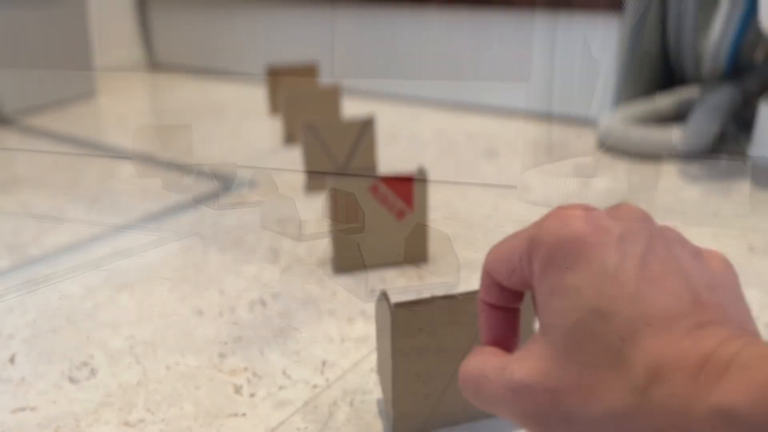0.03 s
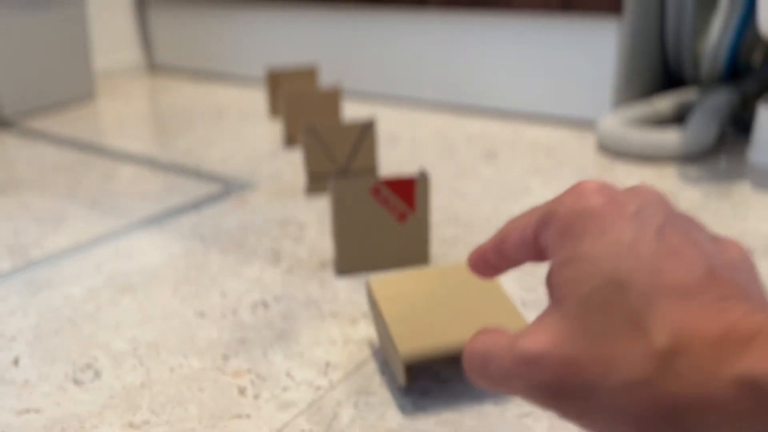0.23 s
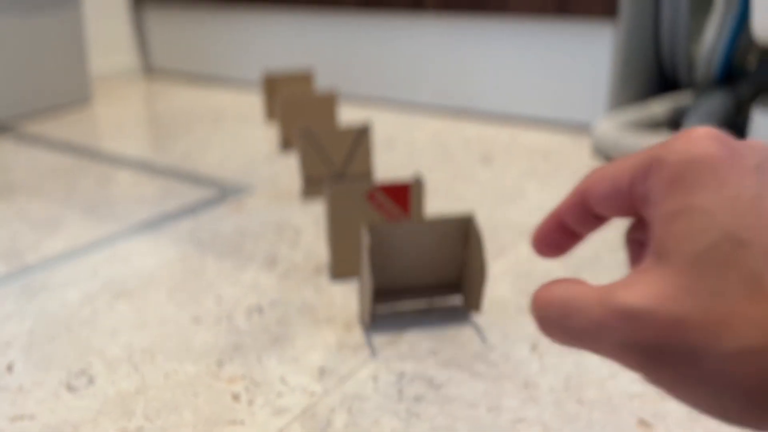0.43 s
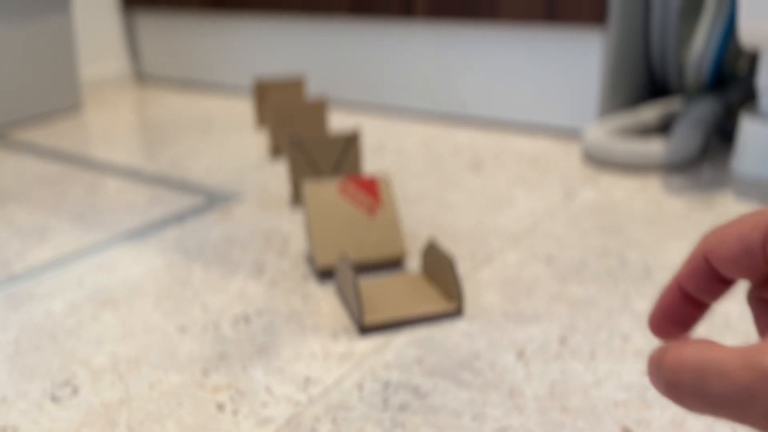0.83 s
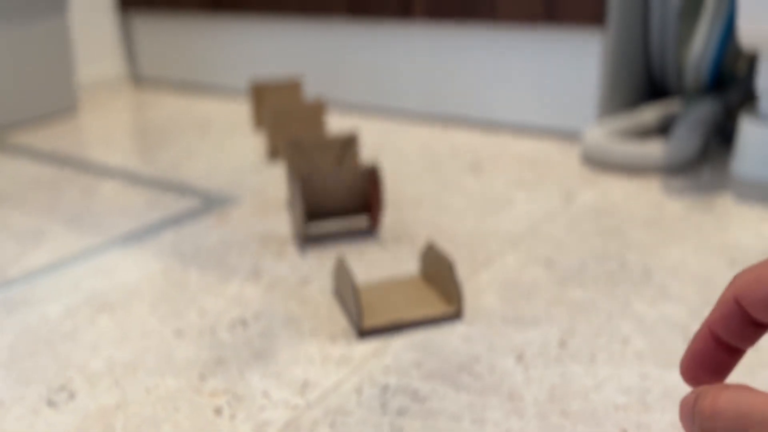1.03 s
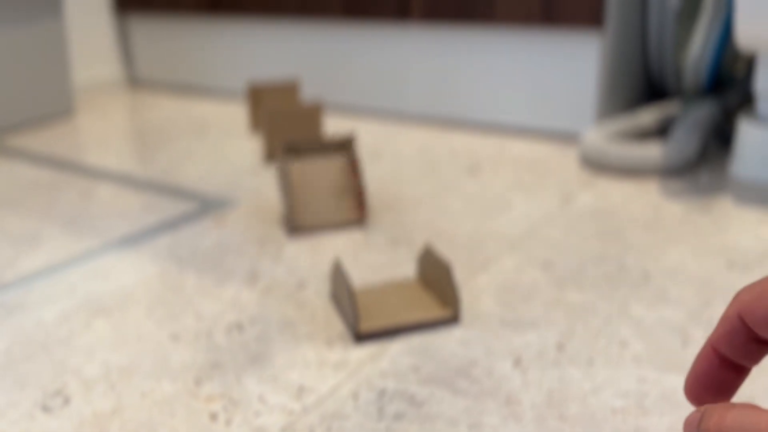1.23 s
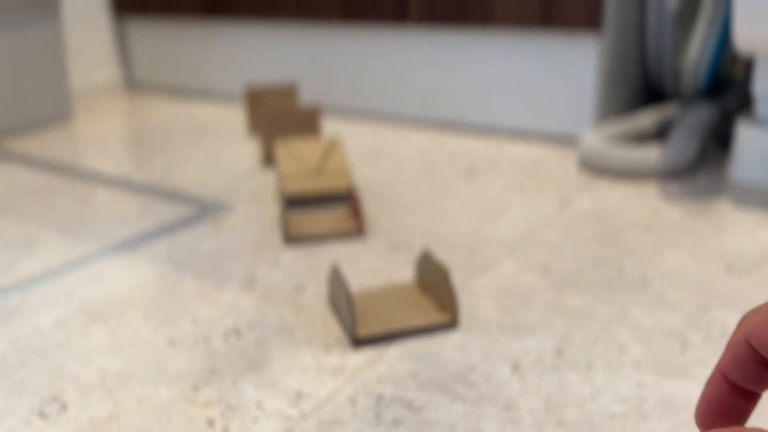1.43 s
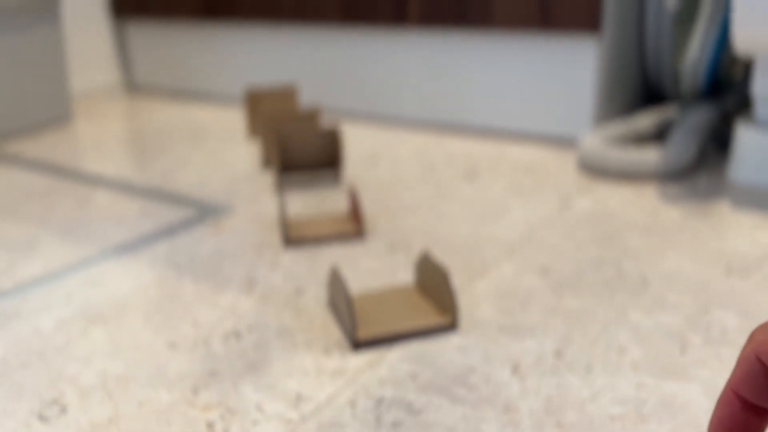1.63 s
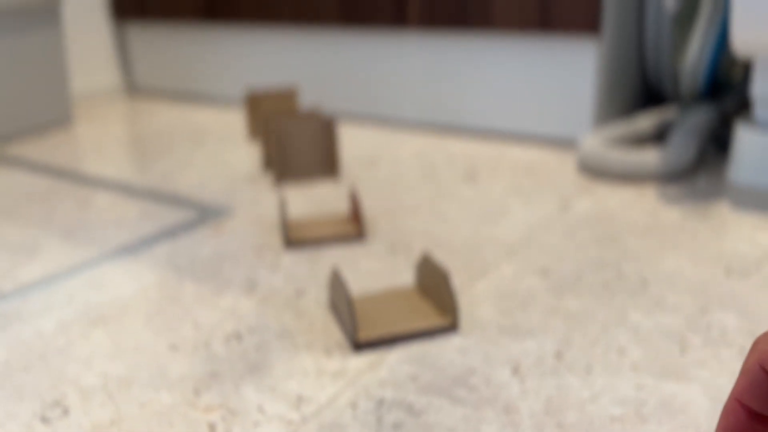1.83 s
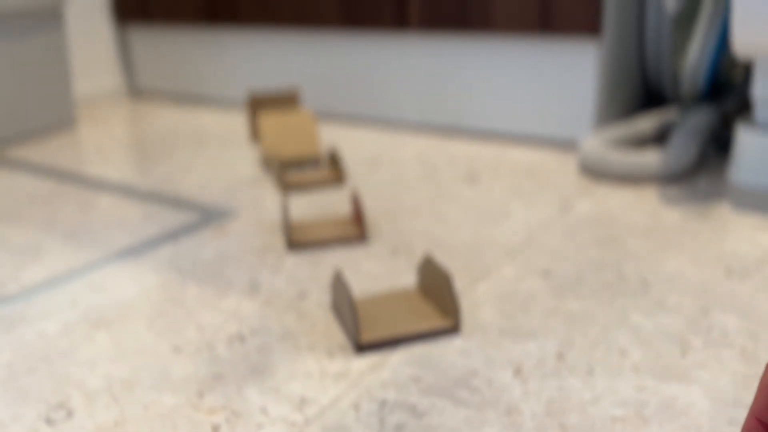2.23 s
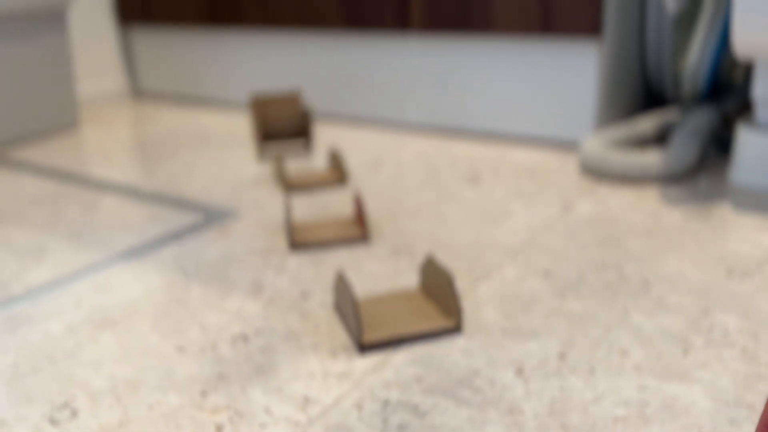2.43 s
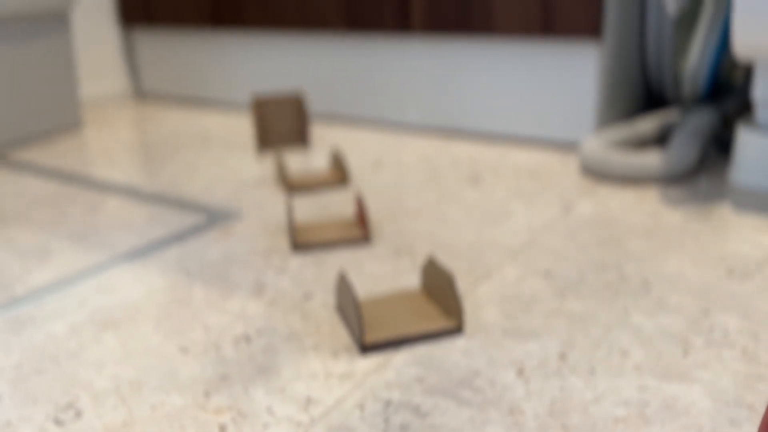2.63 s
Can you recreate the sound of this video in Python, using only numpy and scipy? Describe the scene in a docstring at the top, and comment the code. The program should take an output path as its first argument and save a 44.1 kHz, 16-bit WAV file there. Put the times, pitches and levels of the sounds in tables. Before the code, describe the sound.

Light cardboard pieces knock each other over in a row after a nearby fingernail click. Each taps the next, scrapes down it and slaps the hard floor, slightly to the left, in a small room with faint ventilation rumble.

```python
"""Folded cardboard pieces topple like dominoes on a stone floor.
They knock into each other and slap the floor, which makes their panels and flaps ring
and pushes out a puff of air. In between, their cut edges scrape down the next piece.
A fingernail flick starts it all. A small room echoes over a low ventilation rumble."""
import sys
import numpy as np
from scipy import signal
from scipy.fft import rfft, irfft
from scipy.io import wavfile

SR = 44100
rng = np.random.default_rng(int(sys.argv[2]) if len(sys.argv) > 2 else 0)


def master_out(mix):
    """Clip the mix to full scale and print it as 16-bit PCM to the path in sys.argv[1]."""
    frames = np.transpose(np.atleast_2d(mix))
    ceiling = np.clip(frames, -1, 1)
    pcm = np.round(ceiling * 32767).astype(np.int16)
    wavfile.write(sys.argv[1], SR, pcm)


N = 119070

# knocks on card and floor: t/s, then level/dB of edge tick, air thump, panel, flaps, crack
KNOCKS = [(0.189, -68, -57, -50, -72, -87), (0.2049, -36, -35, -31.5, -39, -39.5),
          (0.2683, -42, -36, -32, -33, -45), (0.2736, -26, -29.5, -25, -30, -32),
          (0.3316, -35.5, -41, -31, -47, -64), (0.3614, -62, -54, -34, -50, -67),
          (0.3739, -41, -42, -41.5, -65, -67), (0.6556, -36.5, -53, -50.5, -50.5, -62.5),
          (0.8615, -42, -56, -35.5, -45.5, -65.5), (0.9493, -30, -40.5, -43, -41.5, -37.5),
          (1.0304, -37.5, -42.5, -39.5, -52.5, -59), (1.2595, -36.5, -52.5, -59.5, -48, -57.5),
          (1.2672, -29.5, -48.5, -42, -49.5, -71.5), (1.4302, -39, -48.5, -41.5, -41.5, -60.5),
          (1.508, -35, -61, -58, -58, -51), (1.512, -35.5, -63, -55, -37.5, -39),
          (1.5499, -39, -54, -47, -45, -72), (1.5883, -53, -57, -44, -40.5, -66.5),
          (1.5999, -64, -48.5, -40.5, -37.5, -61), (1.7681, -55.5, -57, -56.5, -57.5, -74.5),
          (1.869, -73.5, -63, -59, -61.5, -88), (2.0335, -34.5, -48, -44.5, -45, -63),
          (2.2489, -38.5, -67, -48, -52.5, -61.5), (2.2718, -47, -59, -40, -50, -63.5),
          (2.3404, -50, -41.5, -34.5, -38, -37.5), (2.3888, -58.5, -46, -40, -56, -78),
          (2.4226, -48.5, -44, -37, -47, -72)]
# a slipping edge catches: t/s, rasp level/dB, body level/dB
CATCHES = [(0.5287, -46.5, -69.5), (0.6584, -34.5, -59), (0.6831, -43, -61), (0.7252, -39, -57),
           (0.7485, -26, -57.5), (0.7659, -34.5, -55), (1.1484, -59, -62.5), (1.3164, -28.5, -58),
           (1.3404, -46, -50.5), (1.3755, -36, -46), (2.0645, -45.5, -53), (2.1105, -36, -49),
           (2.1326, -33, -46), (2.1824, -64, -50.5), (2.2988, -53, -57.5)]
# one piece slides down the next: start t/s, end t/s, body level/dB, rasp level/dB
SLIDES = [(0.668, 0.768, -65.5, -57), (1.313, 1.395, -54.5, -47), (2.031, 2.144, -54, -60.5),
          (2.156, 2.195, -48.5, -49)]
# the finger pushes the first piece: t/s, level/dB
THUDS = [(0.134, -37.5), (0.213, -41.5)]
# when each piece takes over: t/s
PIECE_STARTS = [0, .8, 1.4, 2.0]

# A mode is one tone a thing rings with; its t60 is the time it takes to fade by 60 dB.
# panel modes, one list per piece: f/Hz, level/dB, t60/s
PANEL_MODES = [
    [(640, -2, 0.018), (810, -3, 0.03), (860, 0, 0.038)],
    [(560, 0, 0.025), (665, 13, 0.035), (700, 2, 0.07)],
    [(325, -14, 0.043), (595, -2, 0.06), (660, -10, 0.021)],
    [(540, 5.5, 0.018), (720, 10, 0.02), (802, 2, 0.125)],
]
# flap modes, one list per piece: f/Hz, level/dB, t60/s
FLAP_MODES = [
    [(1130, 3, 0.012), (1300, 2, .055), (1960, -1.5, 0.04)],
    [(1260, -3, 0.045), (1370, -5, 0.04), (1990, -9, 0.03)],
    [(1190, 6, 0.06), (1410, 8, 0.035), (1910, 4, 0.04)],
    [(1150, -3, 0.016), (1380, -1.5, 0.016)],
]
# air pushed out under a piece: f/Hz, level/dB, t60/s
THUMP_MODES = [(178, 0, 0.085), (270, 0, 0.05), (370, -4, 0.035)]
# dull thud of the finger's push: f/Hz, level/dB, t60/s
THUD_MODES = [(81, -2, 0.092), (123, -4.5, 0.055), (230, 2.5, 0.019)]

# A colour says how strong a sound is from low to high pitch.
# clack of the flaps: f/Hz, level/dB
CLACK_COLOUR = [(400, -12), (1250, -6.5), (1650, -15.5), (2050, -8.5), (2600, -24), (4000, -35.5)]
# centre of each piece's crack as it lands flat: f/Hz
CRACK_CENTRES = [2080, 2150, 2300, 3050]
# that crack: multiple of the centre, level/dB
CRACK_COLOUR = [(.3, -10), (.72, -7), (1, 5), (1.2, -2), (1.5, -20), (2.2, -31), (4.5, -46)]
# the room's echo of each crack, swelling just after it: f/Hz, level/dB
CRACK_ECHO_COLOUR = [(350, -10), (700, 6), (1000, -16.5), (1280, 5), (1600, -6.5), (2100, -0.5),
                     (2900, -13.5), (4200, -31)]
# tick and rasp of a cut edge: f/Hz, level/dB
EDGE_COLOUR = [(1200, 5.5), (3000, -1.5), (6000, -4.5), (8500, 8), (12000, 8.5), (15500, 1)]
# body of the card under a sliding edge: f/Hz, level/dB
RUB_COLOUR = [(250, -2), (700, 5), (1300, 3), (2400, -1), (4500, -16.5)]
# fingernail click: f/Hz, level/dB
NAIL_COLOUR = [(1500, -5), (2800, -22), (3900, -12.5), (5400, -29.5), (7800, 0), (12000, -3.5),
               (16000, -13)]
# the room's echo tail: f/Hz, level/dB
TAIL_COLOUR = [(150, -10), (700, -11), (2000, -7.5), (5000, -4.5), (12000, -18.5)]
# ventilation rumble: f/Hz, level/dB
RUMBLE_COLOUR = [(20, -15.5), (40, -3.5), (65, 1), (120, 3.5), (220, -7.5), (350, -20.5), (800, -28),
                 (4000, -48), (8500, -49), (16000, -67)]

# how long the room rings: f/Hz, t60/s
ROOM_DECAY = [(150, 0.15), (800, 0.32), (2000, 0.25), (12000, 0.5)]
# how much louder the direct sound is on the left: f/Hz, level/dB
LEFT_LEAN = [(150, 4), (650, 1.5), (1300, 3.5), (4500, 8), (9000, 0.5)]
# treble dips made by the microphone openings: f/Hz, width/Hz, level/dB
NOTCHES = [(10135, 610, -15.5), (13500, 550, -13)]

SHOT = 8192  # samples in one short sound
AGE = np.arange(SHOT) / SR  # seconds since it began
LEVEL_WINDOW_S, SNAP_DB = .02, -4
CONTACT_LAG_S, CRACK_ECHO_LAG_S = .001, .011
GRAINS_PER_S, GRAIN_SPREAD_DB = 1100, 3
ROOM_GAP_S, EARLY_DB, ROOM_SIDE_HZ = .003, -6, 300
RUMBLE_DB, HUM_DB, WHISTLE_DB, RUMBLE_SIDE_HZ = -53.5, -78.5, -82, 842
LOW_CUT_HZ, HIGH_CUT_HZ = 77, 16200


def knocks():
    """Each knock rings the panel and flaps, with a tick, a thump of air and a crack the room echoes."""
    out = np.zeros(N)
    for s, tick_db, thump_db, panel_db, flap_db, crack_db in KNOCKS:
        piece = piece_at(s)
        flap_tones = ring(FLAP_MODES[piece], scatter=.02)
        flaps = level_shot(flap_tones + undb(-3) * burst(CLACK_COLOUR, t60=.03))
        crack_colour = [(ratio * CRACK_CENTRES[piece], db) for ratio, db in CRACK_COLOUR]
        crack = undb(crack_db) * burst(crack_colour, t60=.012, snap=undb(SNAP_DB))
        thump = undb(thump_db) * ring(THUMP_MODES, scatter=.12, rise_s=.003)
        crack_echo = undb(crack_db - 3.5) * burst(CRACK_ECHO_COLOUR, t60=.17)
        tick = undb(tick_db - 24.5) * burst(EDGE_COLOUR, t60=.006)
        panel = undb(panel_db) * ring(PANEL_MODES[piece])
        add(out, s + CONTACT_LAG_S, tick + thump + panel + undb(flap_db) * flaps + crack)
        add(out, s + CRACK_ECHO_LAG_S, crack_echo)
    return out


def catches():
    """A slipping edge snags for a moment, tugging the card and rasping."""
    out = np.zeros(N)
    for s, rasp_db, body_db in CATCHES:
        tug = noise_puff(t60=.03, rise_s=.001)
        body = undb(body_db) * rubbed_card(tug, s)
        rasp = undb(rasp_db - 19) * burst(EDGE_COLOUR, t60=.025, rise_s=.001)
        add(out, s, body + rasp)
    return out


def slides():
    """An edge drags over paper fibres: tiny clicks that grow louder as the piece speeds up."""
    out = np.zeros(N)
    for start, end, body_db, rasp_db in SLIDES:
        length = abs(end - start)
        speed = (AGE < length) * np.interp(AGE, [0, length], [.35, 1])
        hits = rng.random(SHOT) < GRAINS_PER_S / SR
        sizes = undb(GRAIN_SPREAD_DB * rng.standard_normal(SHOT))
        grains = hits * sizes * rng.choice([-1, 1], SHOT) * speed
        body = undb(body_db) * rubbed_card(grains, start)
        rasp = undb(rasp_db) * level_shot(colour(grains, EDGE_COLOUR))
        add(out, start, np.sqrt(length / LEVEL_WINDOW_S) * (body + rasp))
    return out


def rubbed_card(force, s):
    """Rubbing shakes the whole card and rings its panel and flaps."""
    piece = piece_at(s)
    modes = ring(PANEL_MODES[piece]) + ring(FLAP_MODES[piece])
    shaking = level_shot(colour(force, RUB_COLOUR))
    ringing = level_shot(signal.fftconvolve(force, modes)[:SHOT])
    return level_shot(shaking + undb(-4.5) * ringing)


def flick():
    """A nail clicks on the first piece, which thuds softly as it is pushed over."""
    out = np.zeros(N)
    click = undb(-40) * burst(NAIL_COLOUR, t60=.005, snap=undb(SNAP_DB))
    add(out, s=.1308, x=click)
    for s, db in THUDS:
        add(out, s, undb(db) * ring(THUD_MODES, rise_s=.003))
    return out


def direct_sound(x):
    """Sound that comes straight over is louder on the left and a touch later on the right."""
    hz = freqs(N)
    lean = undb(lookup(LEFT_LEAN, hz) / 2)
    right_delay = np.exp(-2j * np.pi * hz * .000021)  # 21 microseconds
    return irfft(rfft(x) * np.array([lean, right_delay / lean]), N)


def room_echoes(x):
    """Sound bounces off skirting and cupboards, then blurs into a short tail."""
    n = SR // 2
    t = np.arange(n) / SR
    centres = np.log([hz for hz, _ in ROOM_DECAY])
    noise, tail = rfft(rng.standard_normal((2, n))), 0
    for share, (_, t60) in zip(np.eye(len(centres)), ROOM_DECAY):
        band = irfft(noise * np.interp(np.log(freqs(n) + 1), centres, share), n)
        decay = fade(t60, t) * np.clip(t / ROOM_GAP_S - 1, 0, 1)
        tail = tail + band * decay / np.sqrt(np.sum(decay ** 2))
    early = rng.laplace(size=(2, n)) * fade(t60=.16, t=t) * (t > ROOM_GAP_S / 2)
    early *= undb(EARLY_DB) / np.sqrt(np.sum(early ** 2, axis=1, keepdims=True))
    echoes = signal.fftconvolve(x[None], colour(tail, TAIL_COLOUR) + early, axes=1)[:, :N]
    mid = echoes.mean(axis=0)
    width = freqs(N) / np.hypot(freqs(N), ROOM_SIDE_HZ)  # long waves reach both sides alike
    return mid + irfft(rfft(echoes - mid) * width, N)


def ventilation():
    """A rumble, alike in both ears in the bass, with a thin hum and one brief, faint whistle."""
    mid, side = (unit(colour(rng.standard_normal(N), RUMBLE_COLOUR)) for _ in range(2))
    width = .5 * np.sqrt(freqs(N) / (freqs(N) + RUMBLE_SIDE_HZ))
    side = irfft(rfft(side) * width, N)
    rumble = undb(RUMBLE_DB) * np.array([mid + side, mid - side])
    swell = np.sin(np.interp(np.arange(N) / SR, [2.47, 2.64], [0, np.pi]))
    whistle = undb(WHISTLE_DB) * narrow_noise(hz=6900, width_hz=650) * swell
    hum = undb(HUM_DB) * narrow_noise(hz=845, width_hz=8.2)
    return rumble + hum + whistle


def piece_at(s):
    """Which piece is falling at s seconds."""
    return np.searchsorted(PIECE_STARTS, s) - 1


def ring(modes, scatter=.01, rise_s=.00046):
    """The fading tones of a struck thing, tuned a little differently each time."""
    tones = 0
    for hz, db, t60 in modes:
        pitch = hz * (1 + scatter * rng.standard_normal())
        tones += undb(db) * fade(t60) * np.sin(2 * np.pi * pitch * AGE)
    return level_shot(tones * (1 - np.exp(-AGE / rise_s)))


def noise_puff(t60, rise_s):
    """Noise that rises quickly and dies away."""
    return rng.standard_normal(SHOT) * fade(t60) * (1 - np.exp(-AGE / rise_s))


def burst(points, t60, rise_s=.0001, snap=0):
    """Many short modes blur into coloured noise; snap adds a sharp click at the start."""
    puff = level_shot(noise_puff(t60, rise_s))
    click = level_shot(1. * (AGE == 0))
    return level_shot(colour(puff - snap * click, points))


def narrow_noise(hz, width_hz):
    """Noise close to one pitch."""
    band = np.exp(-((freqs(N) - hz) / width_hz) ** 2)
    return unit(irfft(rfft(rng.standard_normal(N)) * band, N))


def colour(x, points):
    """Filter x to give it the colour in a table."""
    n = x.shape[-1]
    cepstrum = irfft(np.log(undb(lookup(points, freqs(n)))), n)
    # fold it forward in time, so the filter never rings before the sound
    cepstrum[1:n // 2] *= 2
    cepstrum[n // 2 + 1:] = 0
    return irfft(rfft(x) * np.exp(rfft(cepstrum)), n)


def undb(db):
    """Turn decibels into a gain."""
    return 10 ** (np.asarray(db) / 20)


def lookup(points, hz):
    """Read between a table's rows on a log-frequency axis."""
    table = np.array(points, float)
    return np.interp(np.log(hz + 1), np.log(table[:, 0]), table[:, 1])


def freqs(n):
    """Frequencies in the spectrum of n samples."""
    return np.arange(n // 2 + 1) * SR / n


def unit(x):
    """Scale to an average strength (rms) of 1."""
    return x / np.sqrt(np.mean(x ** 2))


def level_shot(x):
    """Give a short sound the energy of rms 1 held for LEVEL_WINDOW_S."""
    return x * np.sqrt(LEVEL_WINDOW_S * SR / np.sum(x ** 2))


def add(out, s, x):
    """Mix x in at s seconds."""
    i = max(int(s * SR), 0)
    out[i:i + len(x)] += x[:N - i]


def fade(t60, t=AGE):
    """Die away by 60 dB every t60 seconds."""
    return np.exp(-np.log(1000) * t / t60)


def scene():
    """The row topples in its room; the close flick gets slightly less echo."""
    finger = flick()
    falls = knocks() + catches() + slides()
    return direct_sound(falls + finger) + room_echoes(falls + undb(-1) * finger) + ventilation()


def record(dry):
    """The microphone openings dent the treble; deep bass is thinned and the very top is cut."""
    notches = undb(sum(db * np.exp(-((freqs(N) - hz) / width) ** 2) for hz, width, db in NOTCHES))
    high_cut = signal.ellip(10, .2, 80, HIGH_CUT_HZ, fs=SR, output="sos")
    low_cut = signal.butter(2, LOW_CUT_HZ, "highpass", fs=SR, output="sos")
    band = signal.sosfreqz(np.vstack([low_cut, high_cut]), freqs(N), fs=SR)[1]
    return irfft(rfft(dry) * notches * band, N)


dry = scene()
out = record(dry)
master_out(out)
```